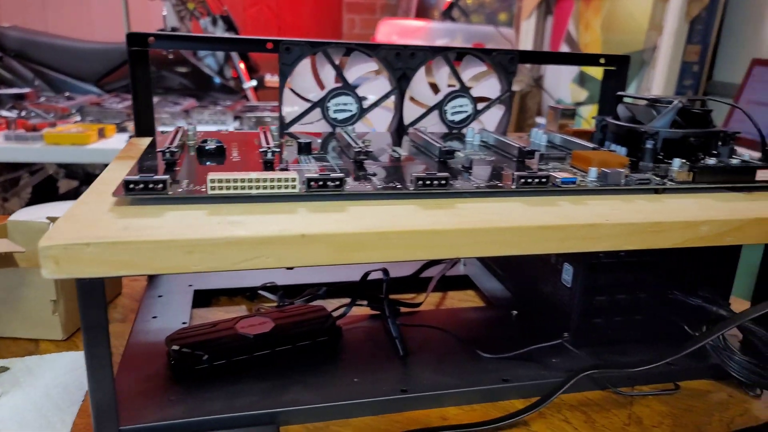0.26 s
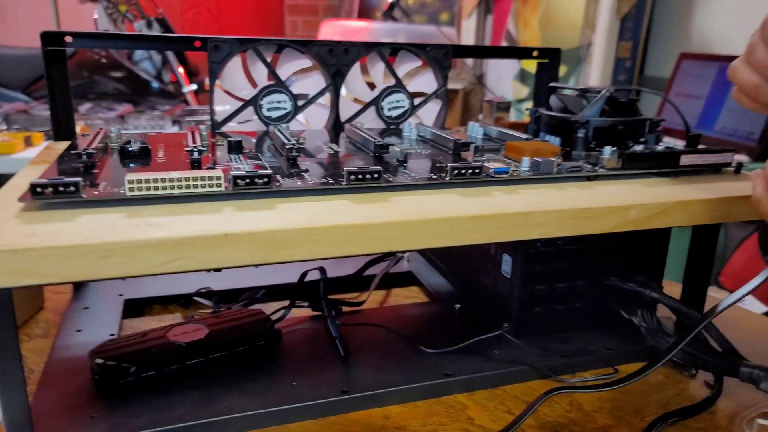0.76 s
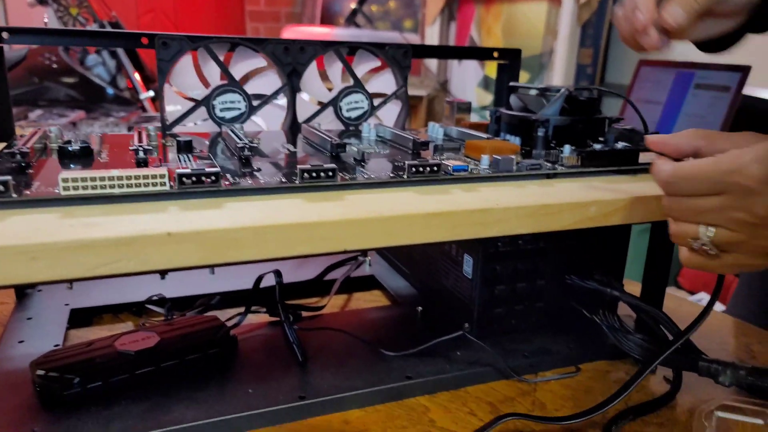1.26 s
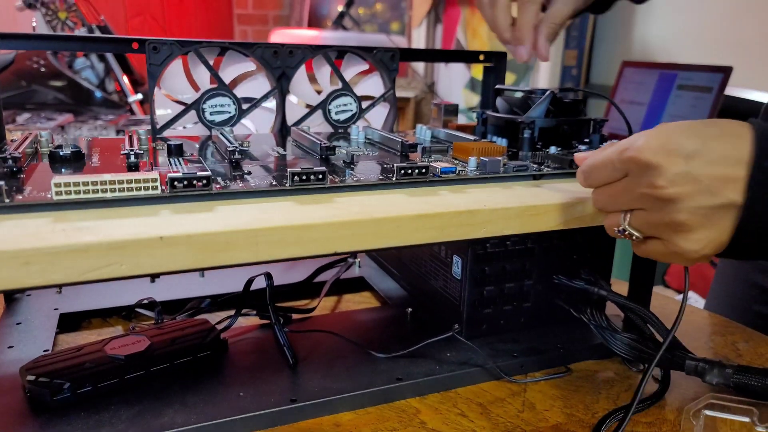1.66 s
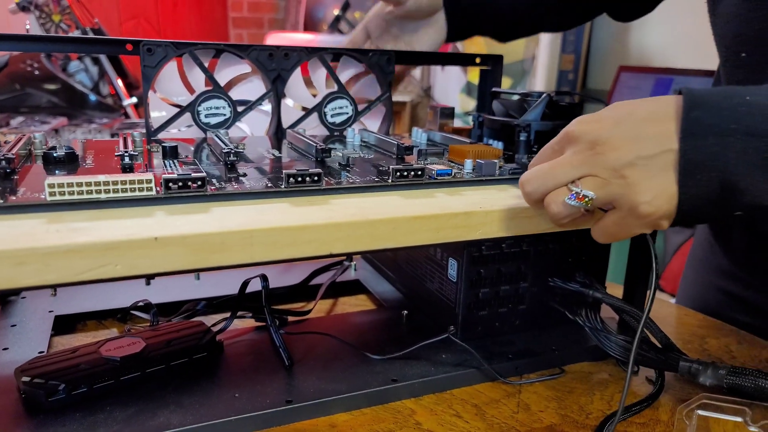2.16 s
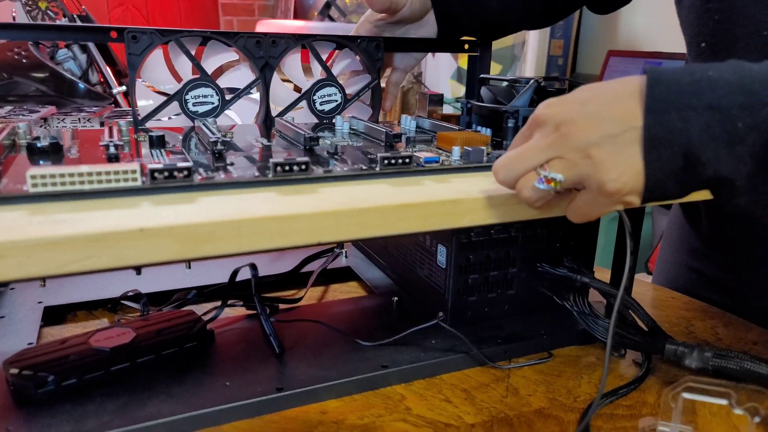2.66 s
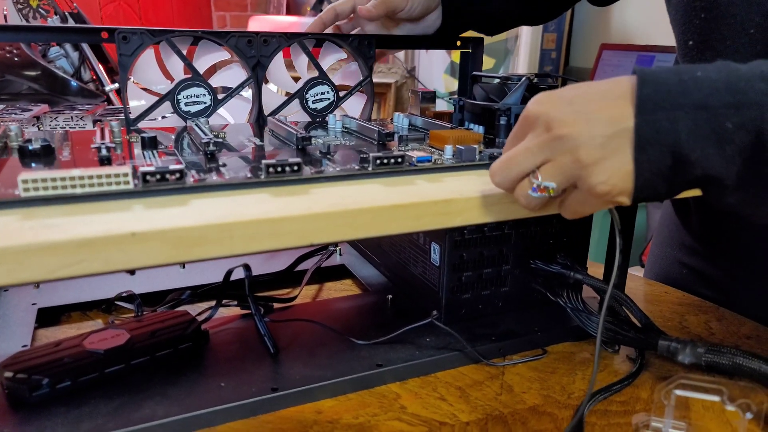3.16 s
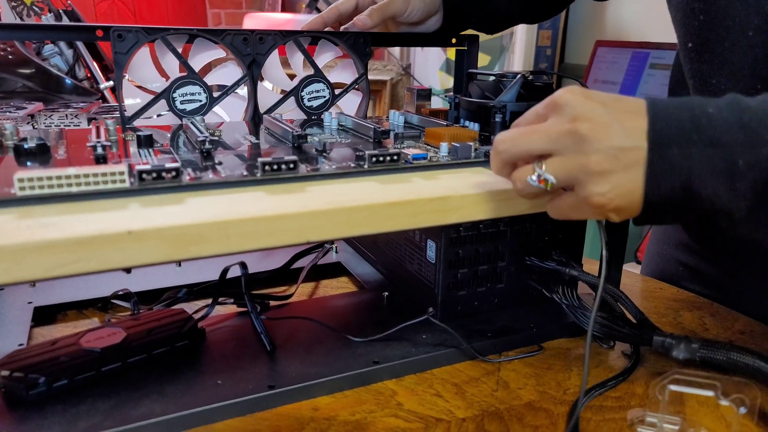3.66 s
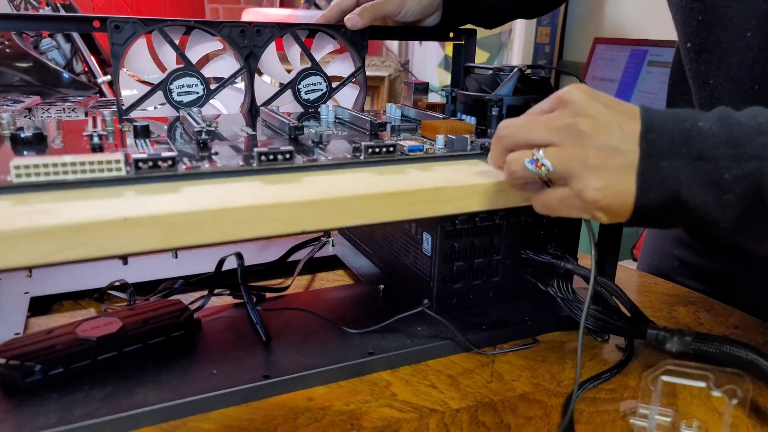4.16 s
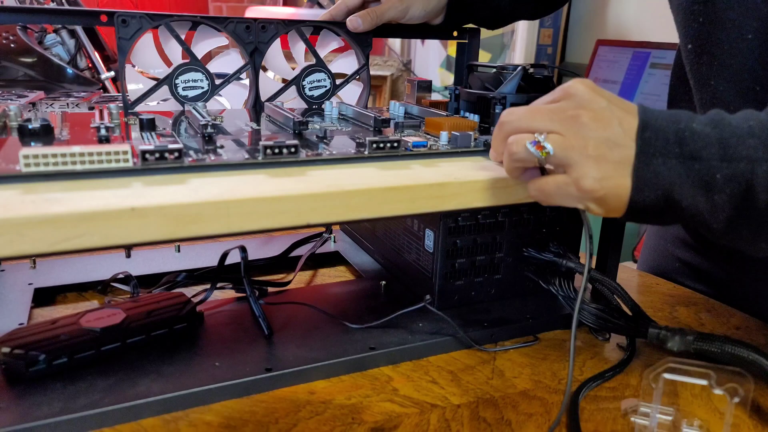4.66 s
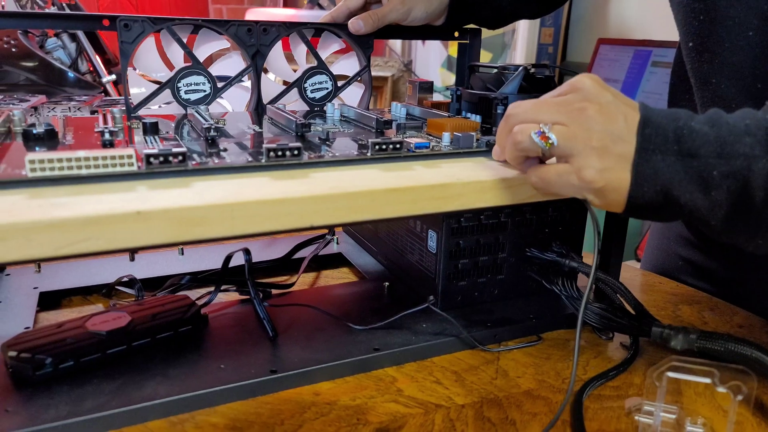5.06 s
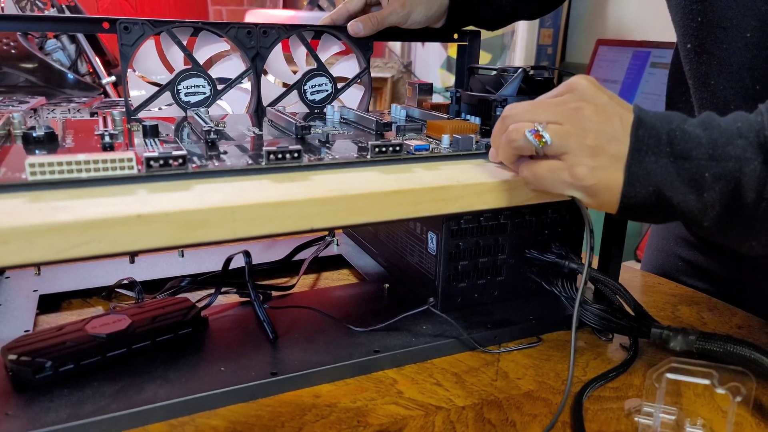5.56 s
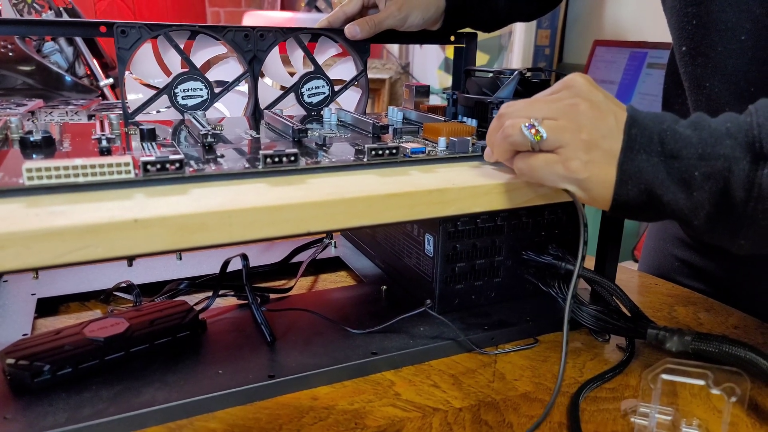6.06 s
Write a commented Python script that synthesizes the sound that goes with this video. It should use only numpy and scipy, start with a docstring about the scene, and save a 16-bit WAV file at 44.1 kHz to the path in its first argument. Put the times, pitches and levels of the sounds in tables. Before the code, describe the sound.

A small, quiet room with steady low air noise and a faint wavering hum, heard close in stereo. From about 0.6 to 1.1 s a cable bumps a wooden frame in soft, dull thuds, with light sleeve brushing. At 1.17 s a plug taps the socket with a thud and short scrape; more small taps and grainy plastic rubbing follow at 1.5-1.8 s, strongest near 1.73 s, fading by 2.2 s. Then near stillness, only faint cloth rustle around 3.3-3.7 s. At 3.83 s a clear double tap with a tiny bright tick. At 4.77 s a dull bump and brief scuff; at 5.1 s a faint brush, at 5.4 s a barely audible touch. At 6.07 s the plug snaps home: a very loud, sharp crack, a duller second stop within milliseconds, bright shell ringing, short room reflections and a weak low thump.

```python
"""In a small humming room, a cable plug is felt into its socket on a circuit board lying on a wooden frame.
Cable bumps are short thuds with frame modes; plug taps ring board modes; ticks are brief noise bands.
Scrape and sleeve are grainy filtered noise under strokes and brushes; scuffs are single noise bands.
At last the plug snaps home: two close hard stops with cracks and shell modes, then ringing and a low thump.
Behind it lie steady coloured noise and wavering narrow-band hum."""
import sys
import numpy as np
from scipy import signal
from scipy.fft import rfft, irfft, next_fast_len
from scipy.io import wavfile

SR = 44100
rng = np.random.default_rng(int(sys.argv[2]) if len(sys.argv) > 2 else 0)


def generate_wav(signal):
    """Clip the signal to [-1, 1] and save it as 16-bit WAV at the path in sys.argv[1]."""
    frames = np.transpose(np.atleast_2d(signal))
    scaled = np.clip(frames, -1, 1) * 32767
    pcm = np.round(scaled).astype(np.int16)
    wavfile.write(sys.argv[1], SR, pcm)


N = 278221
TIME = np.arange(N) / SR
SIDES = np.array([[1], [-1]])  # left, right


def from_db(db):
    """Decibels to amplitude gain."""
    return np.exp(np.maximum(db, -300) * (np.log(10) / 20))


def rms_one(x):
    """Scale to unit power."""
    return x / np.sqrt(np.mean(x ** 2) + 1e-20)


def at_hz(points, hz):
    """Interpolate a table on a log-frequency axis."""
    f, value = np.transpose(points)
    return np.interp(np.log(np.maximum(hz, 1)), np.log(f), value)


def band_weight(centres, centre, hz):
    """Triangular band on a log-frequency axis; the bands of all centres sum to one."""
    return at_hz(np.c_[centres, centres == centre], hz)


def pan(db):
    """Left and right gains for a left-right level difference."""
    return from_db(db / 2 * SIDES)


def shape(x, response):
    """Filter by a response given as a function of frequency."""
    size = next_fast_len(x.shape[-1] + 2048, real=True)
    hz = np.arange(size // 2 + 1) * SR / size
    return irfft(rfft(x, size) * response(hz), size)[..., :x.shape[-1]]


def white(size):
    """Two unrelated channels of white noise."""
    return rng.standard_normal((2, size))


def noise(spectrum, size):
    """Two unrelated channels of coloured noise, rms 1."""
    return rms_one(shape(white(size), lambda hz: from_db(at_hz(spectrum, hz))))


def cut(x, hz, kind, order=2):
    """Butterworth filter."""
    edges_hz = np.clip(hz, 10, .45 * SR)
    return signal.sosfilt(signal.butter(order, edges_hz, kind, fs=SR, output="sos"), x)


def fade(t60_s, size):
    """Exponential decay by 60 dB per t60."""
    return from_db(-60 * TIME[:size] / t60_s)


def sine(hz, size):
    """Sine from zero phase."""
    return np.sin(2 * np.pi * hz * TIME[:size])


def wander(per_s):
    """Random curve of about unit spread, linear between knots at the given rate."""
    knots = rng.standard_normal(4000)
    return np.interp(TIME * per_s, np.arange(len(knots)), knots) * np.sqrt(1.5)


def add(out, s, sound):
    """Mix a sound in at a time."""
    start = round(s * SR)
    out[:, start:start + sound.shape[-1]] += sound[:, :N - start]


def snap(size=16000):
    """Each hard stop cracks and rings the shell's modes; board, frame and room ring out after it."""
    # latch lets go, then plug hits the socket bottom: t/s, level/dB, low-pass/Hz
    stops = [(6.0678, 0.5, 13900), (6.0733, -7, 2800)]
    # plug shell and socket modes: f/Hz, relative level/dB, t60/s, left-right/dB
    shell_modes = [(710, -27, 0.28, -2), (780, -19.5, 0.092, -4.5), (880, -27, 0.16, 11),
                   (1357, -16, 0.1, -10.5), (1500, -16, 0.12, 9.5), (1720, -16, 0.072, 0),
                   (1640, -25.5, 0.23, 8), (1720, -8, 0.026, -7), (2000, -19.5, 0.12, -13),
                   (2200, 1.5, 0.056, 3.5), (2290, -15.5, 0.031, 12.5), (2380, -17.5, .13, 0.5),
                   (2573, -9, 0.027, -12.5), (3003, -28.5, 0.17, 19.5), (4460, -23, 0.041, -1.5),
                   (4300, -46.5, 0.24, -7.5), (5060, -5, 0.018, 13), (5650, -28.5, 0.06, 0),
                   (6860, -15, 0.042, 7.5), (7300, -30.5, 0.028, 8)]
    # crack spectrum: f/Hz, relative density/dB
    crack_spectrum = [(300, -26), (950, -20), (1200, -22), (1700, 17.5), (2400, -11.5), (3300, 3.5),
                      (5000, 1.5), (6000, 1.5), (7200, 4), (8600, 2.5), (10000, -7.5), (13500, 4.5),
                      (15500, -10.5)]
    # after-ring spectrum: f/Hz, relative density/dB
    ringing_spectrum = [(100, -24.5), (260, -20.5), (350, -9.5), (700, 2), (880, 2.5), (1150, -9),
                        (1700, 9.5), (2300, 3), (3300, -6.5), (4300, -3.5), (5800, -12), (7200, -8.5),
                        (10000, -13), (15500, -17.5)]
    out = np.zeros((2, N))

    shell = np.zeros((2, size))
    for k, (hz, db, t60_s, pan_db) in enumerate(shell_modes):
        shell += (-1) ** k * from_db(db) * pan(pan_db) * sine(hz, size) * fade(t60_s, size)
    shell *= from_db(-8.0)

    for s, db, bright_hz in stops:
        mid, side = noise(crack_spectrum, size)
        crack = from_db(-2.5) * rms_one(mid + 2.6 * side * SIDES) * fade(0.012, size)
        stop = cut(cut(shell + crack, bright_hz, "low"), 450, "high")
        add(out, s, from_db(db) * stop)

    # reflections from nearby things arrive in uneven clumps
    clumps = from_db(2 * wander(400)[:size])
    ringing = from_db(-17.5) * dying(noise(ringing_spectrum, size)) * (1 - fade(0.04, size)) * clumps
    # the jolt shakes the wooden frame
    rumble = rms_one(cut(rng.standard_normal(size), [60, 190], "band"))
    thump = from_db(-44) * rumble * fade(0.59, size) * (1 - fade(0.022, size))
    out += from_db(-13.5) * room(out)
    add(out, stops[0][0], ringing + thump)
    return out


def taps(size=6000):
    """Each tap rings the board's modes and chatters briefly, within its own treble and bass limits."""
    # plug on socket: t/s, peak/dB, low-pass/Hz, high-pass/Hz
    contacts = [(1.17, -27.5, 9000, 950), (1.174, -25.5, 2200, 350), (1.201, -40, 3500, 600),
                (1.516, -36.5, 4000, 700), (1.577, -33.5, 6000, 850), (1.651, -41, 7000, 1000),
                (1.722, -31, 2500, 850), (1.735, -23.5, 2500, 420), (1.764, -32, 3000, 900),
                (1.923, -48, 3000, 800), (1.970, -40.5, 1800, 1100), (2.114, -40, 1500, 1000),
                (2.147, -30.5, 5160, 1390), (3.827, -17.5, 3060, 1030), (3.859, -25.5, 3020, 1050),
                (3.989, -45.5, 4000, 840), (5.384, -40.5, 2000, 800)]
    # socket and board modes: f/Hz, relative level/dB, t60/s
    board_modes = [(424, 16, 0.11), (673, 2, 0.016), (800, 8.5, 0.03), (850, 4, 0.05), (1203, -0.5, 0.036),
                   (1368, 0, 0.061), (1510, -9, 0.08), (1700, -13.5, 0.13), (1985, -20.5, 0.067),
                   (2490, -5.5, 0.023), (2990, -3.5, 0.031), (4040, -25, 0.063), (4180, -6, 0.0033),
                   (5140, -14.5, 0.039), (6000, -3.5, 0.01), (7070, -8.5, 0.016), (9500, -50, .01),
                   (12500, -35, .01)]
    out = np.zeros((2, N))
    hz, mode_db, t60_s = np.transpose(board_modes)[:, :, None]
    for s, db, bright_hz, low_hz in contacts:
        strength = from_db(mode_db + 1.4 * rng.standard_normal(hz.shape)) * rng.choice([-1, 1], hz.shape)
        ring = (strength * fade(t60_s, size) * sine(hz, size)).sum(0)
        grit = from_db(-13) * white(size) * fade(0.044, size)
        chatter = from_db(-10.5) * rms_one(cut(white(size), [1700, 3300], "band")) * fade(0.041, size)
        blow = cut(ring + grit + chatter, bright_hz, "low", order=1)
        blow = cut(blow, low_hz, "high", order=4)
        add(out, s, from_db(db) * blow / np.abs(blow).max())
    return out


def bumps(size=8000):
    """A soft contact swells and dies within a few cycles; the frame's modes ring in a random mix."""
    # cable and hand on the frame: t/s, level/dB, f/Hz
    contacts = [(0.6715, -24, 600), (0.7025, -31.5, 616), (0.801, -33, 620), (0.84, -43, 386),
                (0.876, -39, 730), (0.916, -27.5, 683), (0.976, -40, 600), (1.057, -37.5, 583),
                (1.171, -28.5, 490), (1.257, -46, 814), (2.054, -38.5, 770), (4.765, -23.5, 667),
                (4.792, -42, 540), (4.941, -45, 690)]
    # upper frame modes: f/Hz, relative level/dB, t60/s
    frame_modes = [(1100, -12.5, 0.024), (1420, -19.5, 0.027), (1880, -24, 0.03), (2780, -27, 0.023),
                   (3380, -23.5, 0.0096)]
    pan_db, firm_db = -8.5, -26
    ring_db_per_db = 0.4  # a softer contact weakens the upper modes more than the thud
    out = np.zeros((2, N))
    for s, db, hz in [*contacts, *cable_drag()]:
        age = TIME[:size] * hz / 0.95
        thud = (age * np.exp(1 - age)) ** 2 * sine(hz, size)
        share = rng.uniform(.3, 1.4, len(frame_modes)) * rng.choice([-1, 1], len(frame_modes))
        ring = sum(k * from_db(mode_db) * sine(f, size) * fade(t60_s, size)
                   for k, (f, mode_db, t60_s) in zip(share, frame_modes))
        hardness = from_db(ring_db_per_db * (db - firm_db))
        add(out, s, from_db(db) * pan(pan_db) * (thud + hardness * ring * np.minimum(age, 1)))
    return out


def cable_drag(count=24):
    """Loosely timed weak bumps cut off at to_s; as from_s equals to_s, rarely more than one is left."""
    from_s, to_s, gap_s = 0.99, 0.99, .02
    level_db, spread_db, pitch_hz = -40, 3, 527
    late, strong, high = rng.standard_normal((count, 3)).T
    s = from_s + gap_s * (np.arange(count) + 0.32 * late)
    rows = np.c_[s, level_db + spread_db * strong, pitch_hz * np.exp(.2 * high)]
    return rows[s < to_s]


def ticks(size=4000):
    """Tiny bright slips of plastic over plastic: band noise with a short rise and decay."""
    # hard plastic edge: t/s, level/dB, f/Hz (band lies at 0.53-0.81 f), t60/s
    slips = [(0.7525, -46, 4500, .022), (3.8238, -42, 5500, .04), (4.765, -48, 3500, .025),
             (4.788, -44, 5800, .025), (4.8775, -46, 6000, .06)]
    out = np.zeros((2, N))
    for s, db, hz, t60_s in slips:
        slip = rms_one(cut(white(size), [hz * 0.53, hz * 0.81], "band", order=1))
        add(out, s, from_db(db) * slip * fade(t60_s, size) * (1 - fade(0.0064, size)))
    return out


def friction(spectrum, per_s, grain_db, smooth, spread, patchy_db, count=10):
    """Micro-slips over a smooth hiss; as the contact point moves, resonances come and go."""
    size = next_fast_len(N, real=True)
    hz = np.arange(size // 2 + 1) * SR / size
    centres = np.geomspace(350, 12000, count)
    slips = (rng.random(N) < per_s / SR) * rng.choice([-1, 1], N)
    slips = slips * from_db(grain_db * np.minimum(rng.exponential(1, N), 3))
    force = rms_one(slips) + smooth * rng.standard_normal(N) + spread * white(N)
    coloured = rfft(force, size) * from_db(at_hz(spectrum, hz))
    out = np.zeros((2, N))
    for centre in centres:
        band = irfft(coloured * band_weight(centres, centre, hz), size)[:, :N]
        out += band * from_db(patchy_db * wander(60))
    return rms_one(out)


def slide_pressure(range_db=16.5):
    """Each stroke gains range_db over its rise and loses it over its release, linearly in dB."""
    # plug on plastic: t/s of firmest pressure, level/dB, rise/s, release/s
    strokes = [(1.167, -43, 0.031, 0.059), (1.526, -56.5, 0.06, .08), (1.581, -47, 0.053, 0.024),
               (1.732, -36.5, 0.06, 0.058), (1.952, -61, 0.027, 0.03), (2.148, -49.5, 0.16, 0.092),
               (3.824, -61.5, 0.056, 0.055), (5.385, -61.5, 0.15, 0.077)]
    return sum(from_db(db - range_db * np.maximum((s - TIME) / rise_s, (TIME - s) / release_s))
               for s, db, rise_s, release_s in strokes)


def scrape(pressure):
    """The plug slides on plastic: coarse friction follows the pressure."""
    # f/Hz, relative density/dB
    spectrum = [(50, -47), (200, -10), (430, 13.5), (620, 7), (900, 10), (1050, -13), (1230, 16.5),
                (1480, -15), (1850, 8.5), (2200, -16.5), (3050, 1), (4200, -26), (7000, -11.5), (8500, -45),
                (15500, -49)]
    return pressure * friction(spectrum, per_s=800, grain_db=3.2, smooth=.5, spread=.55, patchy_db=3.5)


def scuffs(size=8000):
    """A rub swells and fades: uneven slips through one broad resonance."""
    # fingers, plug and cable: t/s at the middle, level/dB, f/Hz, length/s
    rubs = [(0.567, -64.5, 710, 0.21), (0.867, -59.5, 1700, 0.066), (0.954, -57.5, 655, 0.14),
            (1.152, -44.5, 1300, 0.018), (1.183, -50, 1830, 0.035), (1.215, -48, 450, 0.07),
            (1.726, -40.5, 800, 0.051), (1.744, -54.5, 2300, 0.16), (1.946, -59, 2570, 0.04),
            (1.973, -46, 1350, 0.013), (2.035, -59.5, 2350, 0.051), (2.11, -50.5, 450, 0.11),
            (2.141, -52, 2780, 0.0085), (2.176, -47, 1150, 0.091), (2.401, -57, 68, 0.071),
            (3.283, -74, 900, 0.08), (3.434, -59.5, 780, 0.025), (3.881, -44, 1530, 0.013),
            (4.768, -41.5, 1100, 0.019), (4.805, -47.5, 424, 0.057), (4.807, -55.5, 1140, 0.073),
            (5.091, -63.5, 6500, 0.037), (5.367, -63, 940, 0.1)]
    middle_s = TIME[size // 2]
    out = np.zeros((2, N))
    for s, db, hz, length_s in rubs:
        slips = rng.standard_normal(size) * rng.exponential(1, size) + 0.58 * white(size)
        swell = np.exp(-(2 * (TIME[:size] - middle_s) / length_s) ** 2)
        rub = rms_one(cut(slips, [hz / 1.3, hz * 1.3], "band"))
        add(out, s - middle_s, from_db(db) * swell * rub)
    return out


def arm_motion():
    """Each move of the arm swells and fades evenly."""
    # sleeve and fingers: t/s at the middle, level/dB, length/s
    brushes = [(0.663, -66.5, 0.086), (0.768, -60, 0.051), (0.85, -68.5, 0.071), (0.95, -70.5, 0.3),
               (1.54, -64.5, 0.089), (1.667, -63, 0.055), (1.784, -59.5, 0.067), (1.948, -59.5, 0.031),
               (2.12, -68, 0.32), (2.392, -71, 0.095), (3.3, -65, 0.25), (3.527, -64, .08),
               (3.697, -65, 0.13), (3.818, -59.5, 0.051), (4.435, -69, 0.21), (4.994, -66, 0.053),
               (5.085, -60, 0.047)]
    return sum(from_db(db) * np.exp(-(2 * (TIME - s) / length_s) ** 2) for s, db, length_s in brushes)


def sleeve(pressure, finger_db=-17.5):
    """Cloth friction follows the arm; fingers hiss with each stroke, finger_db below its pressure."""
    # f/Hz, relative density/dB
    spectrum = [(300, 13), (800, 12.5), (3000, 5.5), (7000, -1), (10000, -9), (15500, -8.5)]
    cloth = friction(spectrum, per_s=1500, grain_db=1, smooth=1.0, spread=1.0, patchy_db=4.0, count=4)
    return (arm_motion() + from_db(finger_db) * pressure) * cloth


def ports(x):
    """Near sounds reach the two microphone ports with different phase and level."""
    # f/Hz, left lead/rad
    phase = [(100, 0.1), (250, 0.54), (500, 3.5), (1300, 2), (2200, 3), (3200, 1.11), (6000, 2.21),
             (15000, 0.1)]
    # f/Hz, left-right/dB
    balance = [(100, -3), (500, 3), (1100, 2.5), (2200, -5), (3300, -1), (5000, 5), (7500, 3), (13000, 6.5)]
    return shape(x, lambda hz: pan(at_hz(balance, hz)) * np.exp(.5j * at_hz(phase, hz) * SIDES))


def dying(x):
    """Each frequency of a noise dies at the rate of frame and room."""
    # f/Hz, t60/s
    decay = [(100, 0.33), (300, 0.3), (800, 0.18), (2000, 0.18), (4000, 0.19), (15000, 0.17)]
    centres = np.geomspace(60, 16000, 9)
    return sum(shape(x, lambda hz: band_weight(centres, c, hz)) * fade(at_hz(decay, c), x.shape[-1])
               for c in centres)


def room(x, size=16000):
    """Diffuse reflections that build up over a few milliseconds."""
    response = dying(white(size)) * (1 - fade(0.02, size))
    return signal.oaconvolve(x, rms_one(response) / np.sqrt(size), axes=1)[:, :N]


def background():
    """Still room air, alike on both sides in the bass, and a wavering hum of narrow noise resonances."""
    # f/Hz, relative density/dB
    air_spectrum = [(20, -20.5), (45, -18.5), (65, 3.5), (100, -3.5), (180, 2), (240, -7), (330, -9),
                    (600, -15), (1000, -17), (1600, -18.5), (3200, -20), (5000, -30.5), (7200, -31),
                    (8200, -41.5), (15500, -35)]
    # f/Hz, left-right correlation
    likeness = [(40, 0.85), (150, 0.89), (400, 0.043), (1000, 0.033), (10000, 0.05)]
    # hum, as of fans and ducts: f/Hz, width/Hz, level/dB
    hum_lines = [(70, 5, -75), (113.2, 2.2, -84.5), (159.2, 12, -77), (170, 5.2, -77), (206.4, 5.5, -64),
                 (289, 4.6, -83.5), (1543, 280, -82.5), (2240, 8.5, -85.5)]

    def correlation(hz):
        return np.clip(at_hz(likeness, hz), -1, 1)

    def hum_response(f):
        return sum(from_db(db) * np.sqrt(2 * SR / (np.pi * width)) / (1 + (2 * (f - hz) / width) ** 2)
                   for hz, width, db in hum_lines)

    mid, side = noise(air_spectrum, N)
    mid = shape(mid, lambda hz: np.sqrt(1 + correlation(hz)))
    side = shape(side, lambda hz: np.sqrt(1 - correlation(hz)))
    air = from_db(-67) * (mid + side * SIDES)
    hum_mid, hum_side = shape(white(N), hum_response)
    return (air + hum_mid + 0.37 * hum_side * SIDES) * pan(-0.33)


def scene():
    """Handling sounds close to the microphone, a little room around them, and the hum."""
    pressure = slide_pressure()
    knocks, plug, light = bumps(), taps(), ticks()
    rubbing = scrape(pressure) + scuffs() + sleeve(pressure)
    wet = room(from_db(-15) * knocks + from_db(-13.5) * plug + from_db(-10.0) * light)
    return ports(snap() + plug + knocks + light + rubbing + wet) + background()


def record(dry, cutoff_hz=15750):
    """The highest peaks are rounded and the top is cut."""
    rounded = dry / (1 + (dry / .92) ** 4) ** .25
    return shape(rounded, lambda hz: np.clip((cutoff_hz - hz) / 200 + .5, 0, 1))


dry = scene()
out = record(dry)
generate_wav(out)
```